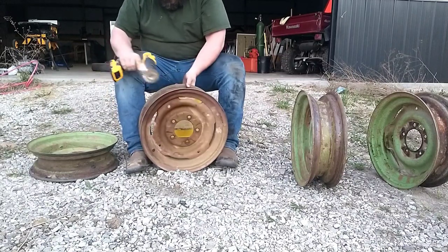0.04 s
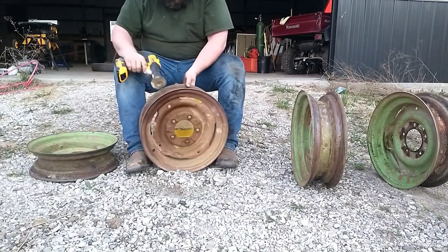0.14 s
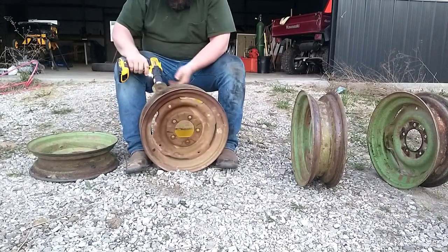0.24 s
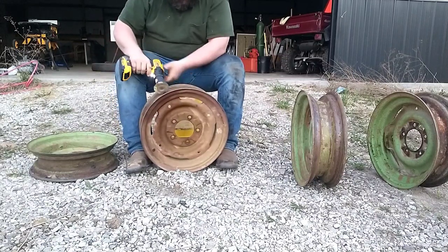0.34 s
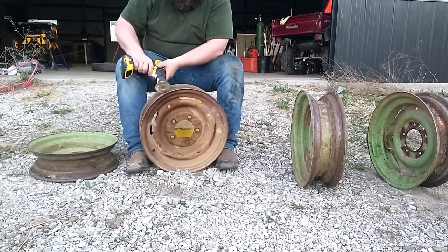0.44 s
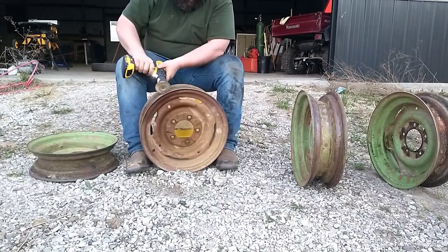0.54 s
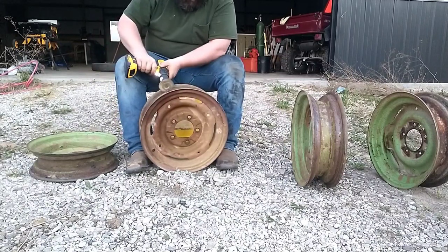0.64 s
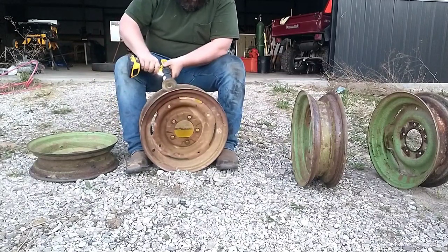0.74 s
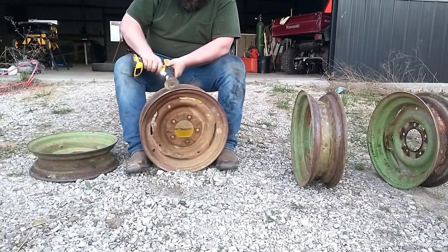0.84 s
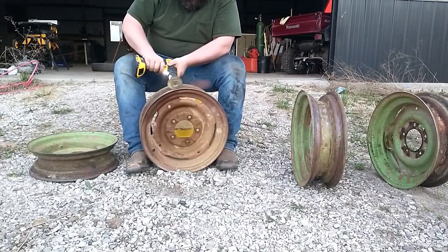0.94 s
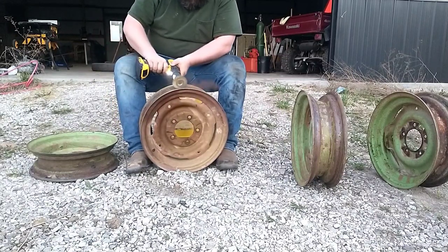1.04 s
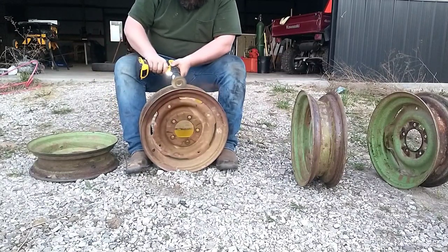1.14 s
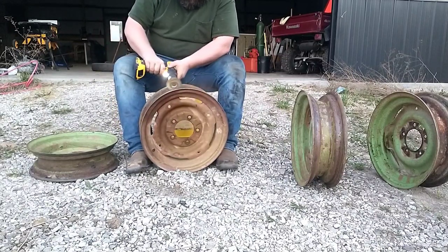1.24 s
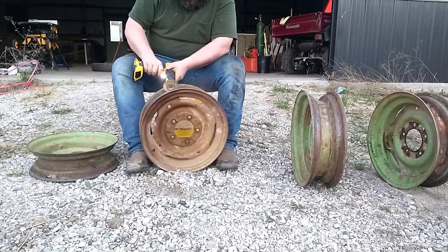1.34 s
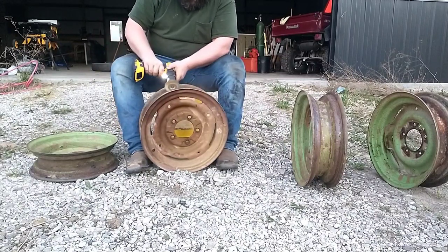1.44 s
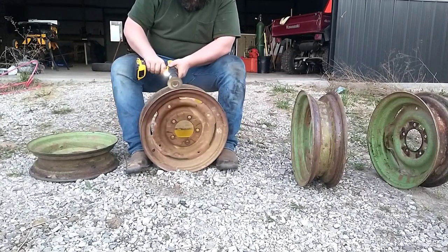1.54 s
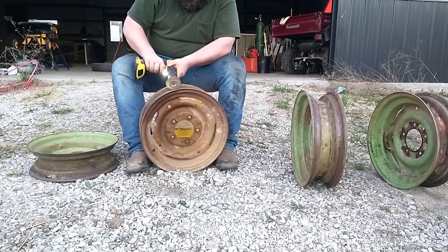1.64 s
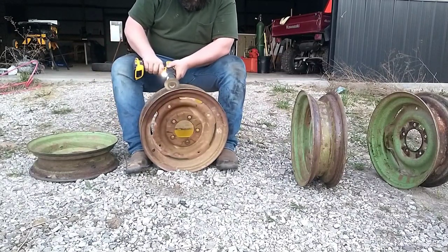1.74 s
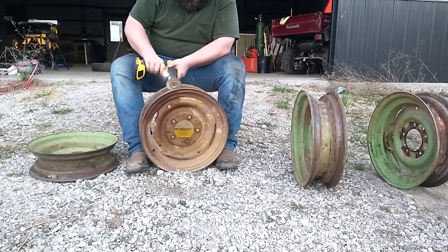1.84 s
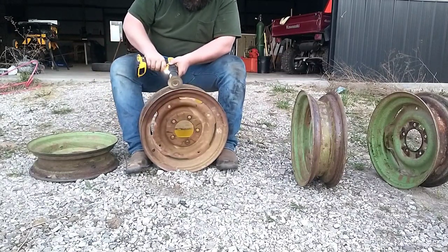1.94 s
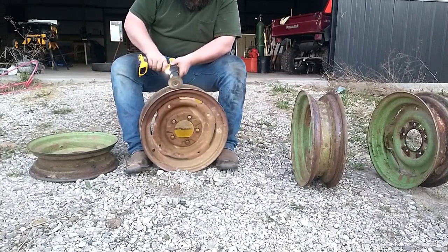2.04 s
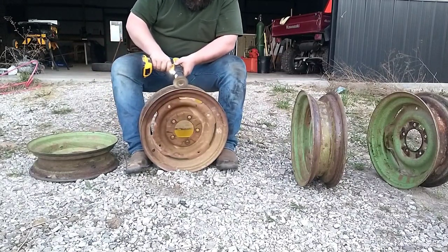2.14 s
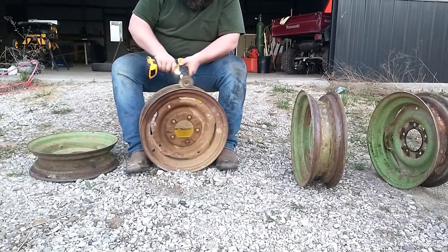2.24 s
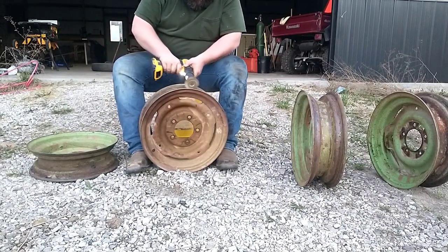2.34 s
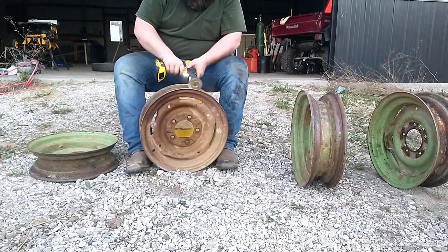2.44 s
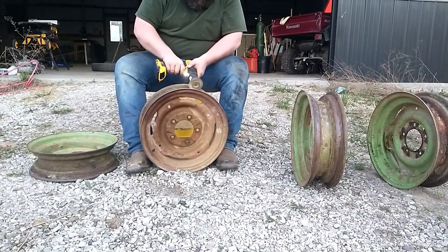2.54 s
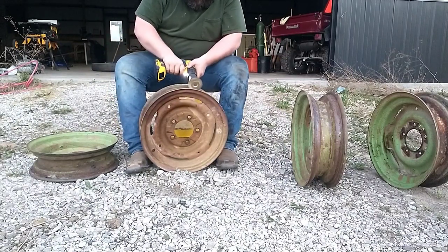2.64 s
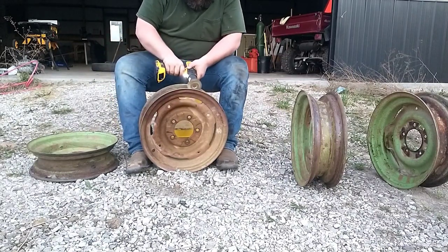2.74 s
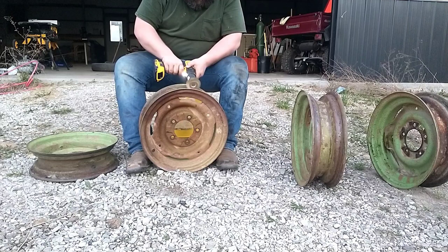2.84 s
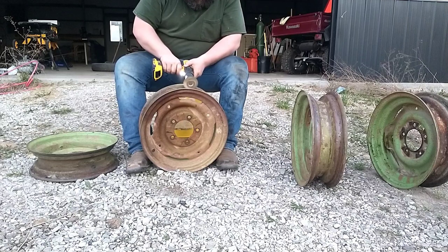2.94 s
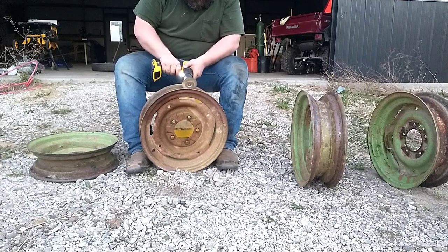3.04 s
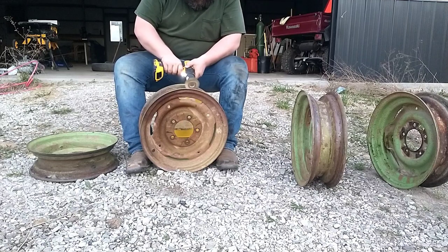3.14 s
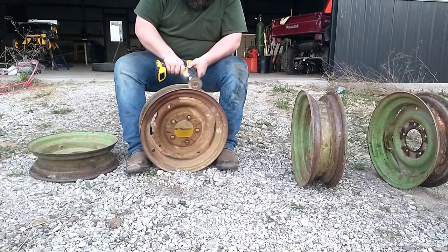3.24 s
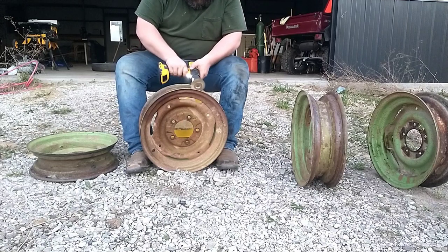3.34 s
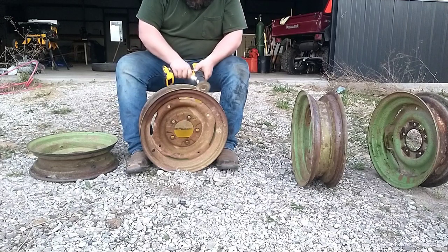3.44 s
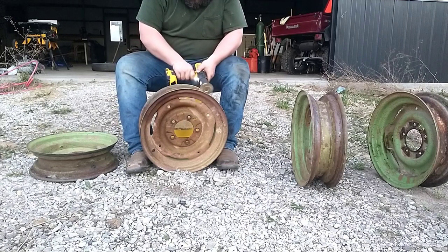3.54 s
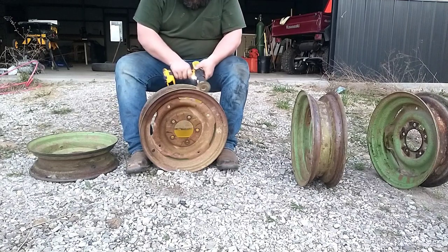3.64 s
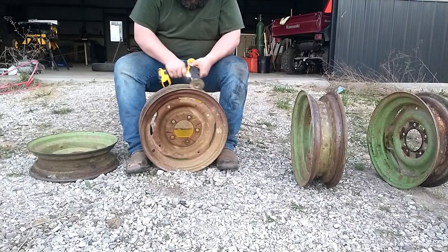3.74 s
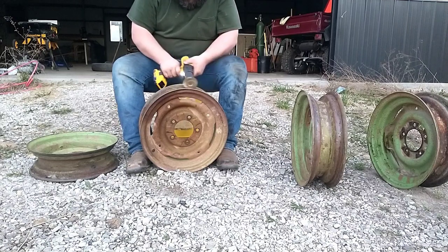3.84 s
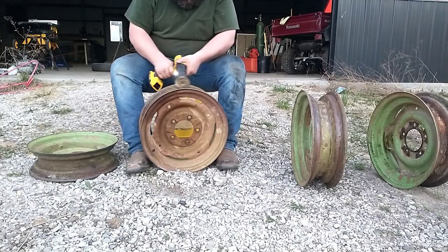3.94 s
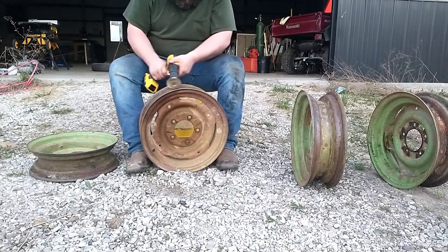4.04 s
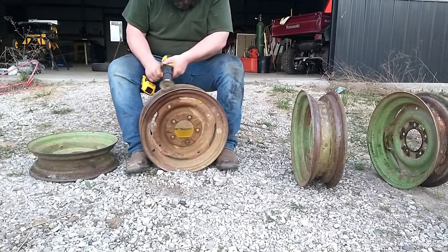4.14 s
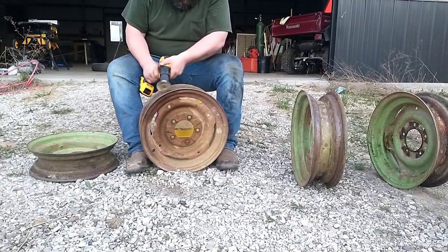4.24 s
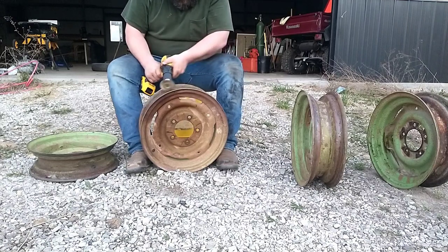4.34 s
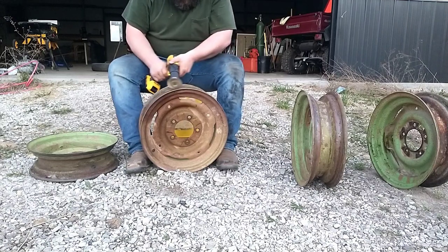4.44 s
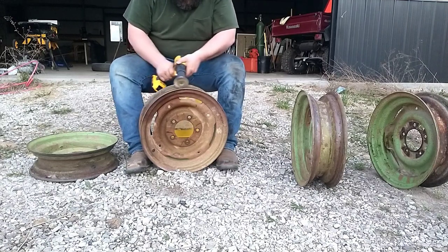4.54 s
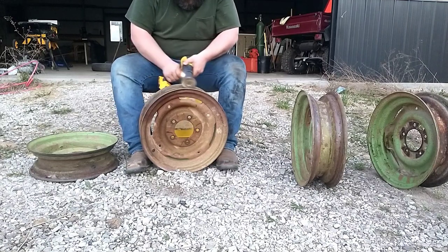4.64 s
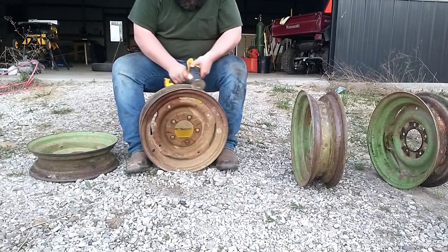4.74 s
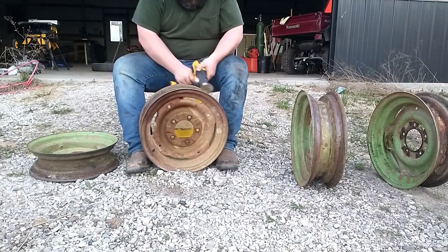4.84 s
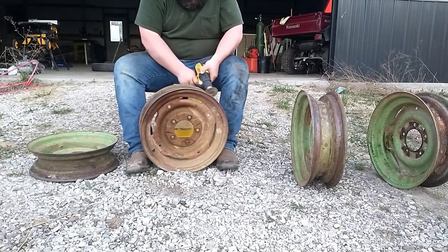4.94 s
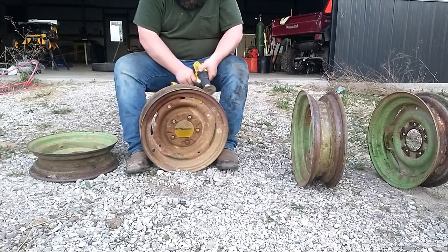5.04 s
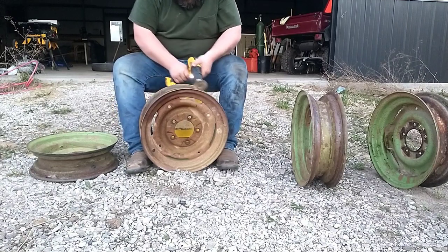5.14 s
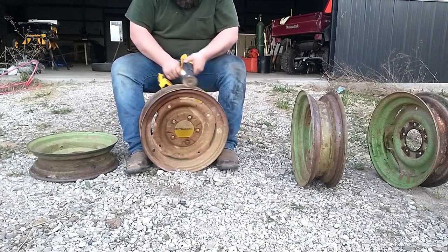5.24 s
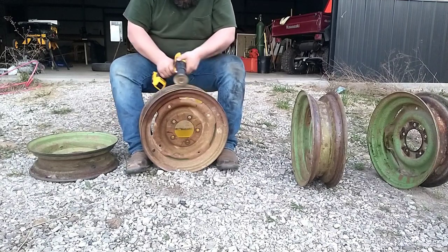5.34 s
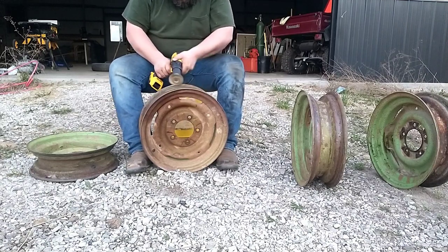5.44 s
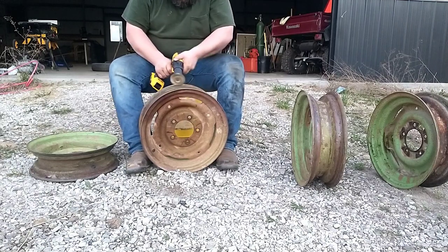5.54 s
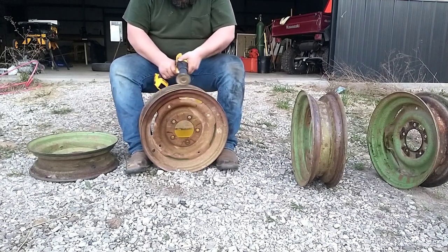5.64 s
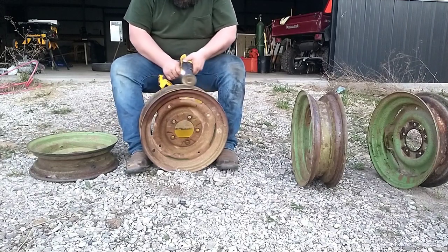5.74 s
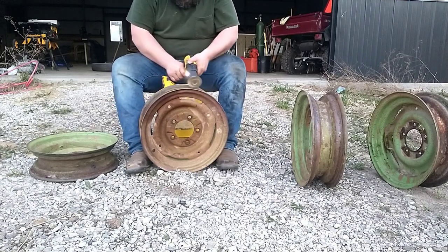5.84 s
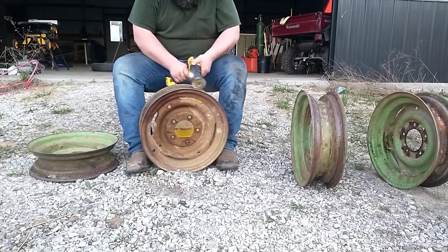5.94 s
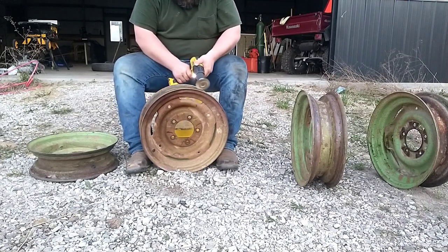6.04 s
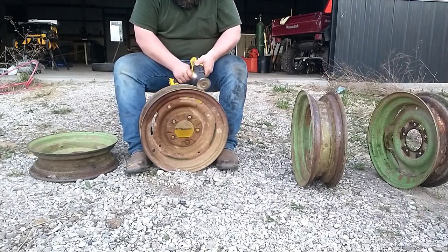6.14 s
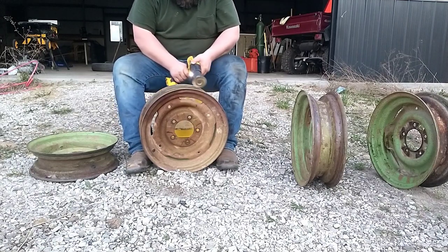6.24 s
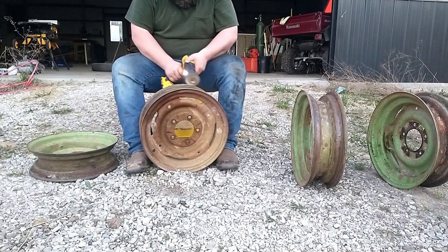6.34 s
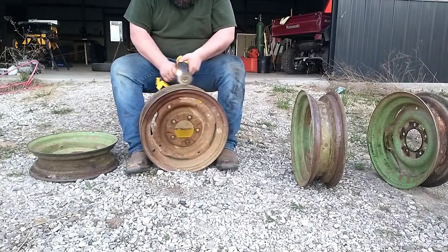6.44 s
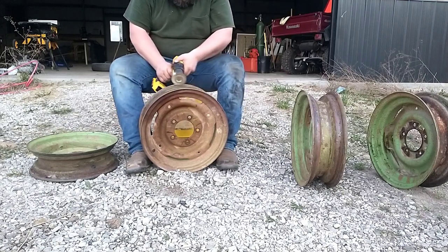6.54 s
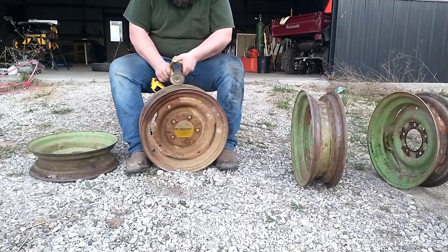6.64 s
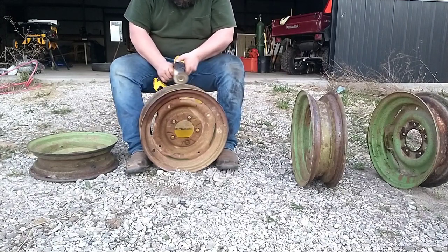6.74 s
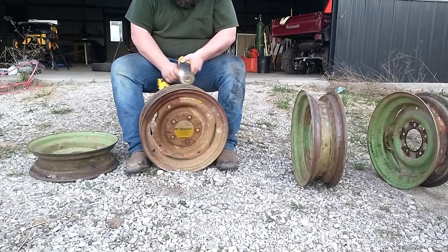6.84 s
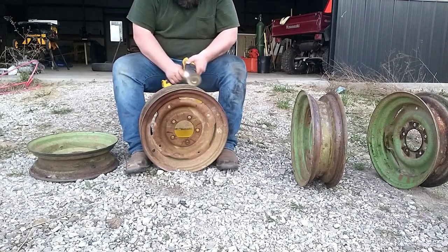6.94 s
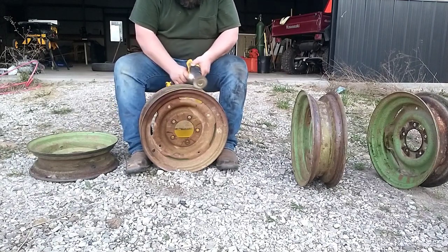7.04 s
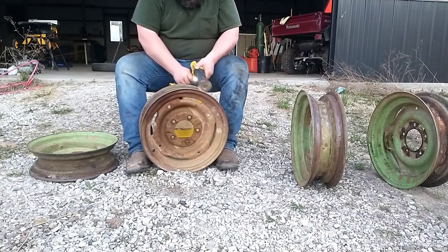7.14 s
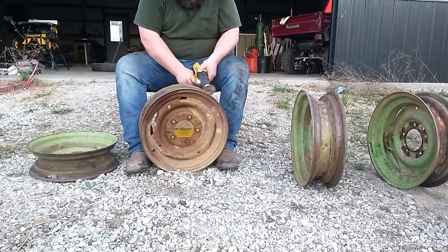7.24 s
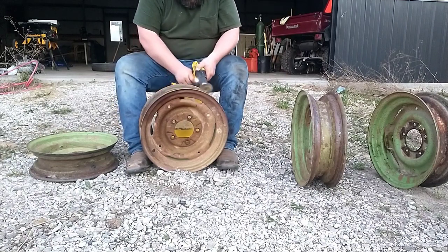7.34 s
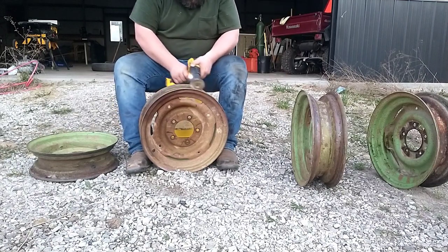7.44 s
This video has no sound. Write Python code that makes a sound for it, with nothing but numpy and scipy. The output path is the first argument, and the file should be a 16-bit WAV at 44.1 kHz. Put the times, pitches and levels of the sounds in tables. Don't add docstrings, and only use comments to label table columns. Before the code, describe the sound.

After brief metal knocks, a high electric drill whine starts and holds while wire bristles hiss harshly on a hollow steel wheel rim.

```python
import sys
import numpy as np
from scipy import signal
from scipy.fft import rfft, irfft, next_fast_len
from scipy.io import wavfile
from scipy.ndimage import uniform_filter1d

SR = 44100
rng = np.random.default_rng(int(sys.argv[2]) if len(sys.argv) > 2 else 0)


def nominal_scale(level):
    x = np.asarray(level, float) / 20
    return 10 ** x


def generate_wav(signal):
    frames = np.transpose(np.atleast_2d(signal))
    scaled = np.clip(frames, -1, 1) * 32767
    pcm = np.round(scaled).astype(np.int16)
    wavfile.write(sys.argv[1], SR, pcm)


N = 329868

# start_s, speed_turns_per_s
WORKING_SPEED = [(.9, 313), (1.01, 307.3), (1.35, 318.8), (1.84, 317), (2.06, 318.6), (2.17, 315.4),
                 (2.5, 315.7), (3.05, 318.3), (3.6, 316), (4.14, 308), (4.43, 313), (4.8, 303.3),
                 (5.02, 305.8), (5.42, 318.2), (5.74, 318.8), (5.85, 315.6), (6.75, 320.4), (7.48, 315)]
# start_s, nose_on_share
FACING = [
    (0, 0.46),
    (3.7, 0),
    (4.2, 1),
    (5.0, 0.75),
    (7.48, 0.7),
]
LOUD_ORDERS = (10, 19, 20, 30)
SIDE_ON_DB = (-23, -26, -33.5, -38)
NOSE_ON_DB = (-33, -33.5, -23, -37.5)
TONE_WAKE = (65.6, 62, 29, 22)
FAINT_ORDERS = (2, 5, 8, 14, 15, 16.08, 18, 21, 25, 35, 38, 40, 45)
FAINT_DB = (-62, -46, -50, -47, -38, -37.5, -40, -44, -41, -46, -51, -49, -50)
# centre_s, half_length_s, level_db
ROCKING = [
    (1.97, 0.043, 0.5),
    (2.4, 0.066, -1.5),
    (2.72, 0.058, -5.5),
    (2.92, 0.092, 3.5),
    (3.1, 0.067, -3),
    (3.24, 0.059, 2),
    (5.87, 0.1, -1),
    (6.3, 0.21, 5),
    (6.75, 0.16, -3),
    (7.2, 0.16, 4.5),
]
# centre_s, half_length_s, level_db
BEAMS = [
    [(.695, 0.006, 15), (.745, 0.09, -5.5), (2.2, 0.055, 3), (6.3, 0.13, -1.5), (1.37, 0.26, 5.5),
     (1.62, 0.23, 4), (1.97, 0.089, 6), (3.5, 0.69, 1), (4.45, 0.2, 4.5), (4.72, 0.054, 1),
     (5.62, 0.13, -8), (6.72, .15, -8)],
    [(.82, 0.027, 2), (1.1, .1, 0.5), (1.55, 0.11, 1), (3.95, 0.27, 5.5), (4.26, 0.092, -6.5),
     (4.95, 0.21, 2), (6.78, 0.32, -5)],
    [(.75, 0.048, -23), (.95, 0.15, -12), (1.17, 0.45, 6), (1.75, 0.32, -0.5), (2.25, 0.1, 9.5),
     (3.2, 0.032, 15), (3.7, 0.28, 1.5), (4.4, 0.9, -8), (4.97, 0.17, 9), (5.9, 0.096, -6.5),
     (6.6, 0.046, -1.5), (6.76, 0.039, -3), (6.92, 0.041, 4)],
    [(.76, 0.046, 3), (1.17, 0.13, 4), (1.72, 0.77, 3.5), (3.8, 0.083, -1), (4.42, 0.45, 10.5),
     (5.0, 0.055, -14), (5.6, 0.4, 9), (5.87, 0.05, -1.5)],
]
# centre_s, half_length_s, level_db
MESH_BEAM = [
    (.97, 0.069, 2),
]
# centre_s, half_length_s, level_db
LOWEST_TONE_FADE = [
    (5.9, 0.61, -20),
]
# start_s, grip_on_free_edge_db, wire_pressure_db
CONTACT = [(.62, -8, -7.5), (.89, 4, -1), (1.1, 4, -1), (1.25, -4.5, -3), (1.5, 1.5, 0), (2.08, 4, -2.5),
           (2.53, -5, 1), (3.28, -9.5, -0.5), (3.65, -2, 3.5), (4.2, 0, 0.5), (4.39, -5, -4.5),
           (4.76, 1, 5.5), (5.12, 1, 3.5), (5.5, -2, 0), (6.23, 2, 1), (6.95, -3, 0), (7.18, 5.5, 1),
           (7.48, 2, 4.5)]
# centre_s, half_length_s, level_db
TOUCH_DOWN = [
    (.85, 0.22, -8),
]
# band_hz, density_db_per_hz
HISS_SPECTRUM = [(550, -45), (800, -25.5), (1000, -21.5), (1400, -11), (1700, -13.5), (2100, -7),
                 (2700, -9), (3700, -7.5), (4800, -2.5), (6500, -4), (9700, -4.5), (11300, -13),
                 (15800, -12)]
FOLLOWS_GRIP = (0.1, .02, .15)
FOLLOWS_PRESSURE = (-0.28, .99, 0.26)
FOLLOWS_FACING = (1, -0.8, 1)
HISS_WAKE = (30, 19, 25)
SNAG_HISS_DB = (10.5, 4.5, 0)
# mode_hz, brushed_db, knocked_db, t60_s
RIM_MODES = [(428, -20, -26, .15), (607, -20, -26, .2), (1063, -13, -11, .33), (1090, -2, -9, .3),
             (1247, -4, -4, .33), (1308, -4, -15, .33), (1356, -11, -24, .25), (1543, 3, -17, .2),
             (1725, -11, -22, .3), (1964, -12, -16, .35), (2155, -1, -18, .22), (2227, -3, -13, .3),
             (2266, -9, -17, .3), (2395, -3, -18, .25), (2495, -2, -23, .2), (2770, -7, -29, .2),
             (2895, -9, -31, .2), (3387, 4, -27, .2), (3595, -8, -30, .18), (4078, -8, -34, .16),
             (4730, -3, -37, .15)]
# start_s, crack_db, ring_db, rise_s, t60_s, brightness_hz
KNOCKS = [(.0, -29, -19, 0.0012, 0.28, 3300), (.0, -52, -99, .01, 0.11, 8550),
          (0.022, -42, -26, 0.002, 0.093, 2540), (0.151, -41.5, -32, 0.0035, 0.11, 3240),
          (.398, -53, -99, 0.0048, 0.18, 11000), (0.4425, -32.5, -35, 0.00037, 0.15, 6700),
          (.52, -57, -76, .01, .1, 4160), (0.614, -35.5, -35, 0.0012, 0.036, 4000),
          (1.516, -25, -10.5, 0.0025, 0.056, 3500), (1.541, -35, -33, 0.0077, 0.031, 5000),
          (1.557, -43, -13, 0.0016, 0.019, 3000), (3.788, -42, -70, .003, .04, 543)]
# band_hz, density_db_per_hz
YARD_SPECTRUM = [(40, -2), (90, 3.5), (140, 1), (200, -5), (300, -12), (450, -8), (700, -15), (1100, -10.5),
                 (2000, -21), (5000, -27), (9000, -33), (16000, -49)]
# centre_s, half_length_s, bass_db, low_middle_db
GUSTS = [(.08, 0.13, 4, 4), (0.303, 0.17, -5.5, -4.5), (.62, 0.073, -5, -7), (.7, 0.041, 1, 6),
         (2.963, 0.24, 2.5, 3.5), (3.096, 0.016, 15, 3), (3.122, .07, 6.5, -3.5), (3.34, 0.037, 8.5, 5),
         (3.502, .025, 19, 2), (3.993, .03, 14, 5), (4.47, 0.082, -6, 2), (4.95, .1, 1.5, -1.5),
         (6.27, 0.098, -5, -6), (6.41, 0.023, 11, -6), (6.585, 0.031, 4, -2), (6.732, 0.039, 3, -3),
         (7.058, 0.036, 9.5, 0), (7.239, 0.071, -2.5, -8)]
# centre_s, half_length_s, level_db
HUM_SWELLS = [(0, 0.77, 5.2), (2.75, 0.83, 8.6), (3.6, 0.34, 4), (4.2, 0.43, 7), (4.8, 0.67, 8.7),
              (5.25, 0.27, 5.5), (5.65, .22, 8.4), (7.5, 0.88, 4.5)]
# band_hz, likeness_share
LIKENESS = [(60, .4), (300, .55), (600, .4), (1400, .85), (3000, .85), (6000, .6), (15000, .4)]
# band_hz, left_minus_right_db
PORT_BALANCE = [(60, -3.5), (150, -3), (300, -1), (1000, .4), (2500, -1), (5000, .2), (6900, 1.6),
                (9400, 6.3), (11700, 1.3), (13800, 3.8), (15500, 2.2)]
# band_hz, phase_rad
LEFT_LEAD = [(100, 0), (430, -.2), (1200, .2), (2900, .6), (4300, 1.5), (5600, 2.2), (16000, 2.2)]
SHARED_BINS = np.r_[292, 320:768:32]

GEAR_RATIO = 12.2


def unit(x):
    return x / np.sqrt(np.mean(x ** 2) + 1e-20)


def in_time(rows):
    s, *columns = np.transpose(rows)
    return [np.interp(np.arange(N) / SR, s, c) for c in columns]


def at_hz(points, hz):
    band_hz, value = np.transpose(points)
    return np.interp(np.log(hz), np.log(band_hz), value)


def swells(rows):
    t = np.arange(0, N, 40) / SR
    level_db = sum(db * np.exp(-((t - s) / half) ** 2) for s, half, db in rows)
    return np.interp(np.arange(N) / SR, t, level_db)


def drift(rate_hz):
    r = np.exp(-80 * np.pi * rate_hz / SR)
    noise = rng.standard_normal(N // 40 + 2002)
    slow = signal.lfilter([1], [1, -2 * r, r * r], noise)[2000:]
    return np.interp(np.arange(N) / 40, np.arange(len(slow)), unit(slow))


def banded(white, spectrum, low_hz, level_db, patchy_db, near):
    out = 0
    edges = low_hz * 2 ** np.arange(0, np.log2(17000 / low_hz), 1 / 3)
    for k, (low, high) in enumerate(zip(edges, edges[1:])):
        band = signal.butter(2, [low, high], "band", fs=SR, output="sos")
        mid, side = signal.sosfilt(band, white[k % 2])
        hz = np.sqrt(low * high)
        alike = np.clip(at_hz(LIKENESS, hz), 0, 1) * (near or hz < 2000)
        lean_db = 1.4 * drift(6) * np.array([[1], [-1]])
        gain = nominal_scale(at_hz(spectrum, hz) + level_db(hz) + patchy_db * drift(11.3) + lean_db)
        out = out + gain * (np.sqrt(1 + alike) * mid + np.sqrt(1 - alike) * side * [[1], [-1]])
    return out


def shaft_speed():
    trigger_s, spin_up_s = .6245, .063
    since = np.clip(np.arange(N) / SR - trigger_s, 0, None)
    easing = .25 * swells(ROCKING)
    working = uniform_filter1d(in_time(WORKING_SPEED)[0], size=3000) + easing
    return np.maximum(working * (1 - np.exp(-since / spin_up_s)), 30)


def running():
    return np.clip((np.arange(N) / SR - .618) / 0.03, 0, 1)


def tone_levels(decades, facing):
    rocking = swells(ROCKING)
    return [side + (nose - side) * facing + wake * decades + rocking + swells(beams)
            for side, nose, wake, beams in zip(SIDE_ON_DB, NOSE_ON_DB, TONE_WAKE, BEAMS)]


def faint_levels(speed):
    spun_db = 70 * np.log10(speed / 315)
    faint_db = [level_db + spun_db * (.2 if order > 30 else 1) + 2.5 * drift(2)
                for order, level_db in zip(FAINT_ORDERS, FAINT_DB)]
    faint_db[0] += swells(LOWEST_TONE_FADE)
    faint_db[5] += swells(MESH_BEAM)
    return faint_db


def motor(speed, turns, loud_db):
    vent_hz, vent_width_hz, vent_db = 7200, 310, 14
    levels_db = loud_db + faint_levels(speed)
    out, (facing,) = np.zeros((2, N)), in_time(FACING)
    for order, level_db in zip(LOUD_ORDERS + FAINT_ORDERS, levels_db):
        throb = 0.033 * np.cos(2 * np.pi * (turns / GEAR_RATIO + rng.random()))
        wander = (0.042 + 0.02 * order) * drift(23)
        phase = 2 * np.pi * order * turns + wander + 0.77 * order * throb
        apart = .01 * order * drift(2) - .7 * (order == 20) + (.2 - .7 * facing) * (order == 19)
        tilt = nominal_scale(.07 * order * drift(3) * np.array([[1], [-1]]))
        flutter_db = (1.1 if order == 10 else 1.9) * drift(11)
        flutter_db += (speed < 290) * (4 * drift(40) - 3)
        flutter_db += vent_db * (order >= 30) * np.exp(-((order * speed - vent_hz) / vent_width_hz) ** 2)
        tone = np.sqrt(2) * np.sin([phase + apart, phase - apart])
        out += nominal_scale(level_db + flutter_db) * (1 + throb) * tilt * tone
    return out * running()


def brush_levels(decades, facing):
    grip, pressure = in_time(CONTACT)
    # start, rise, hold and fall in s
    snag_s = np.cumsum([1.512, .005, .064, .015])
    snag = np.interp(np.arange(N) / SR, snag_s, [0, 1, 1, 0])
    colours_db = [a * grip + b * pressure + c * facing + wake * decades + jump * snag
                  for a, b, c, wake, jump
                  in zip(FOLLOWS_GRIP, FOLLOWS_PRESSURE, FOLLOWS_FACING, HISS_WAKE, SNAG_HISS_DB)]
    colours_db[0] = colours_db[0] + swells(TOUCH_DOWN)
    ringing_db = -38 + grip + 44 * decades + 15 * snag
    return ringing_db, colours_db


def bristles(turns, shape, lopsided):
    sizes = nominal_scale(1.54 * np.minimum(rng.exponential(1, shape), 5)) * rng.standard_normal(shape)
    return unit(sizes) * (1 + lopsided * np.cos(2 * np.pi * turns / GEAR_RATIO))


def hiss(turns, levels_db):
    swing = np.array(levels_db) - np.median(levels_db, axis=1, keepdims=True)
    shared_db = 0.41 * drift(9.0)

    def level_db(hz):
        place = np.interp(np.log(hz), np.log([2300, 4500, 8000]), [0, 1, 2])
        return sum(max(1 - abs(place - k), 0) * swing[k] for k in range(3)) + shared_db

    ticks = bristles(turns, (2, 2, N), lopsided=.04)
    scratch = banded(ticks, HISS_SPECTRUM, 632, level_db, patchy_db=0.86, near=True)
    return nominal_scale(-22.5) * unit(scratch) * running()


def ring(force, hz, t60):
    r, w = nominal_scale(-60 / (t60 * SR)), 2 * np.pi * hz / SR
    drive = np.sqrt(1 - r) * np.array([1, 0, -1])
    return signal.lfilter(drive, [1, -2 * r * np.cos(w), r * r], force + 1e-18)


def knock_shapes():
    t = np.arange(N) / SR
    return np.array([np.clip((t - s) / rise, 0, 1) * nominal_scale(-60 * np.clip(t - s - rise, 0, 1) / t60)
                     for s, _, _, rise, t60, _ in KNOCKS])


def rim(turns, ringing_db):
    shapes = knock_shapes()
    gritty = unit(nominal_scale(1.8 * rng.exponential(1, N).clip(0, 4)) * rng.standard_normal(N))
    rub = bristles(turns, N, lopsided=0.52) * nominal_scale(ringing_db - 9.0) * running()
    favour_db = rng.normal(0, 2.0, (len(KNOCKS), len(RIM_MODES)))
    _, _, ring_db, _, _, bright_hz = np.transpose(KNOCKS)
    out = np.zeros(N)
    for k, (hz, rub_db, knock_db, t60) in enumerate(RIM_MODES):
        tilt_db = 9 * np.log2(hz / 1250)
        blows = nominal_scale(ring_db + favour_db[:, k] + tilt_db * np.log2(bright_hz / 2400)) @ shapes
        contact_db = 2.2 * drift(2.5)
        rubbed = rub * nominal_scale(rub_db + contact_db)
        knocked = np.roll(gritty, 997 * k) * blows * nominal_scale(knock_db - 4.5)
        out += ring(rubbed + knocked, hz, t60)
    for shape, (_, crack_db, _, _, _, top_hz) in zip(shapes, KNOCKS):
        colour = signal.butter(2, [min(800, top_hz / 3), top_hz], "band", fs=SR, output="sos")
        out += nominal_scale(crack_db) * shape * unit(signal.sosfilt(colour, gritty))
    return out


def yard_echo(x):
    dull = signal.lfilter([.5], [1, -.5], x)
    lags_s = np.array([[.0031, .019, 0.036], [.0037, .023, 0.043]])
    lags = (lags_s * SR).astype(int)
    return np.array([sum(np.pad(dull, (lag, 0))[:N] for lag in side) for side in lags])


def far_traffic():
    since_middle_s = (np.arange(N) - N / 2) / SR
    gusts = np.array(GUSTS)
    bass_db = swells(gusts[:, [0, 1, 2]]) - .5 * since_middle_s
    middle_db = swells(gusts[:, [0, 1, 3]]) - .4 * since_middle_s

    def gust_db(hz):
        return bass_db if hz < 210 else middle_db * (hz < 850)

    white = rng.standard_normal((2, 2, N))
    return nominal_scale(-48.0) * unit(banded(white, YARD_SPECTRUM, 40.8, gust_db, patchy_db=0.5, near=False))


def far_engine():
    phase = 2 * np.pi * 90 * np.arange(N) / SR + 1.25 * drift(11.0)
    level_db = -60.5 + swells(HUM_SWELLS) + 3.7 * drift(2.5)
    return nominal_scale(level_db) * np.sqrt(2) * np.sin(phase) * [[1.2], [.7]]


def scene():
    speed, (facing,) = shaft_speed(), in_time(FACING)
    decades = np.log10(np.clip(speed / 312, .33, 1))
    ringing_db, hiss_db = brush_levels(decades, facing)
    turns = np.cumsum(speed) / SR
    drill = motor(speed, turns, tone_levels(decades, facing))
    steel = rim(turns, ringing_db)
    yard = far_traffic() + far_engine()
    return drill + hiss(turns, hiss_db) + steel + nominal_scale(-8.0) * yard_echo(steel) + yard


def shared_treble(ports):
    frames = dict(fs=SR, window="cosine", nperseg=2048, noverlap=1024)
    left, right = signal.stft(ports, **frames)[2]
    chance = rng.standard_normal((len(SHARED_BINS), left.shape[1]))
    mood = unit(uniform_filter1d(chance, size=2, axis=1))
    for k, (low, high) in enumerate(zip(SHARED_BINS, SHARED_BINS[1:])):
        power = abs(left[low:high]) ** 2
        right_power = np.sum(abs(right[low:high]) ** 2, axis=0)
        scale = np.sqrt(right_power / (power.sum(axis=0) + 1e-20))
        steady = power.max(axis=0) / (power.mean(axis=0) + 1e-20) > 9
        quiet = power.mean(axis=0) < 2e-8
        inverted = (mood[k] < -.2 - .8 * steady) & ~quiet
        right[low:high] = left[low:high] * scale * np.where(inverted, -1, 1)
    return signal.istft(np.array([left, right]), **frames)[1][:, :N]


def low_pass(x):
    return signal.sosfilt(signal.butter(12, 15940, fs=SR, output="sos"), x)


def record(dry):
    size = next_fast_len(N + 256)
    hz = np.arange(size // 2 + 1) * SR / size + 1
    half = nominal_scale(at_hz(PORT_BALANCE, hz) / 2) * np.exp(.5j * at_hz(LEFT_LEAD, hz))
    ports = irfft(rfft(dry, size) * [half, 1 / half], size)[:, :N]
    ports = signal.sosfilt(signal.butter(2, 48, "high", fs=SR, output="sos"), ports)
    mix = shared_treble(ports)
    return low_pass(mix)


dry = scene()
out = record(dry)
generate_wav(out)
```